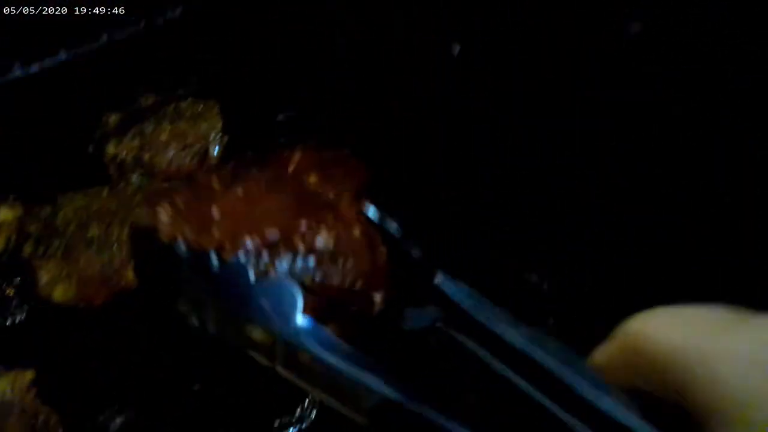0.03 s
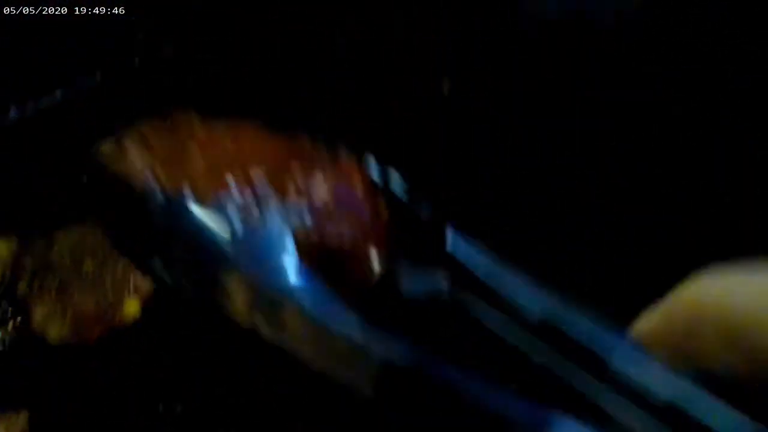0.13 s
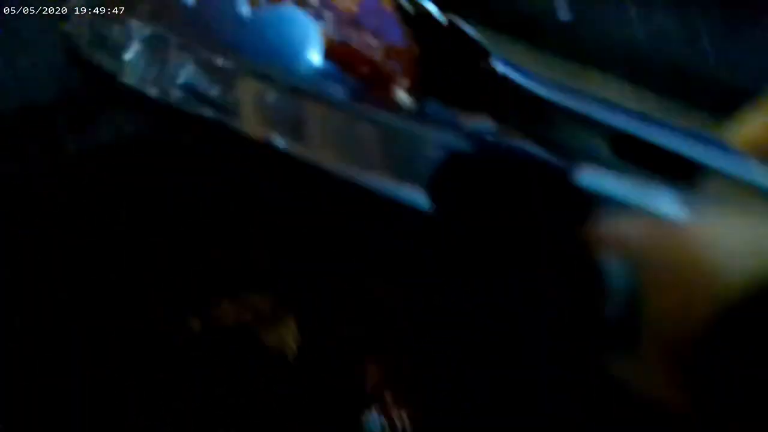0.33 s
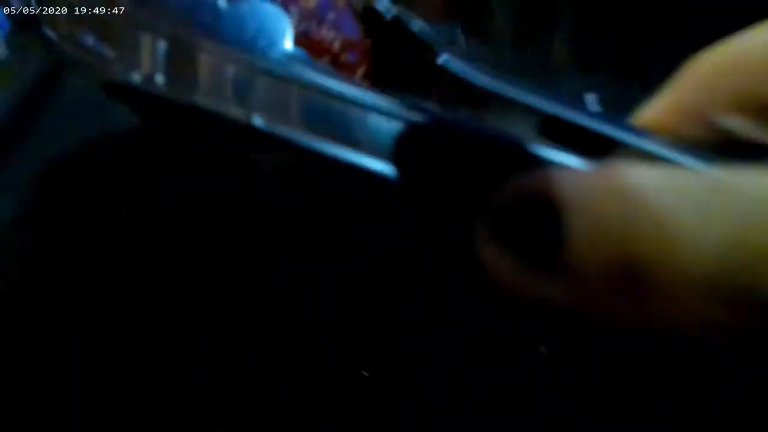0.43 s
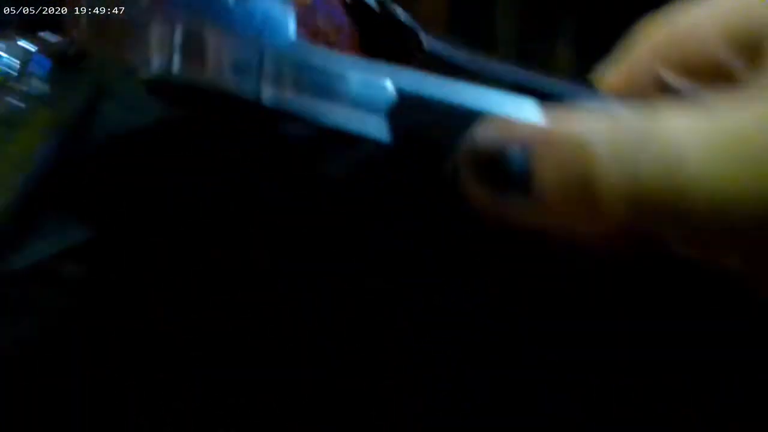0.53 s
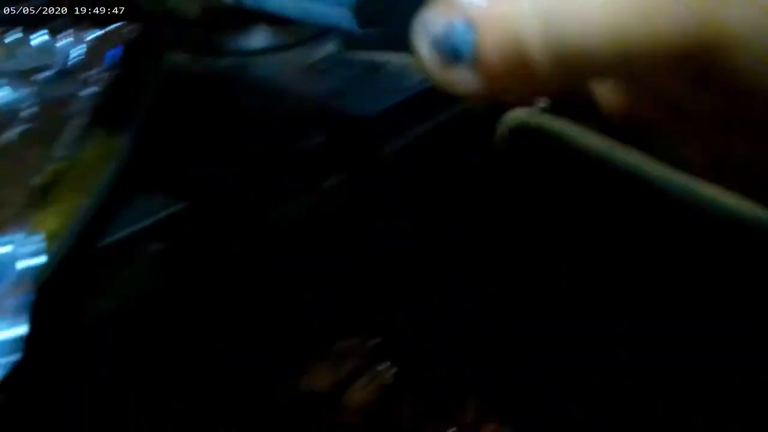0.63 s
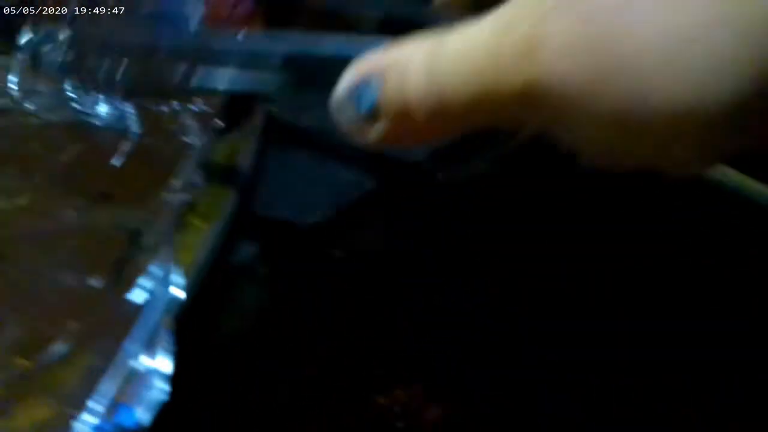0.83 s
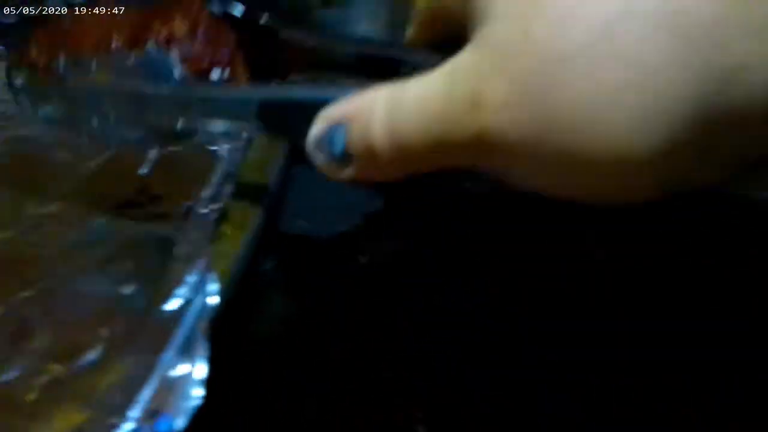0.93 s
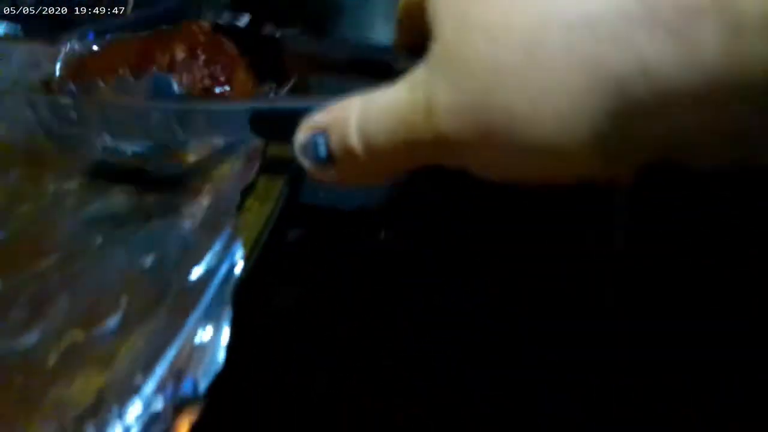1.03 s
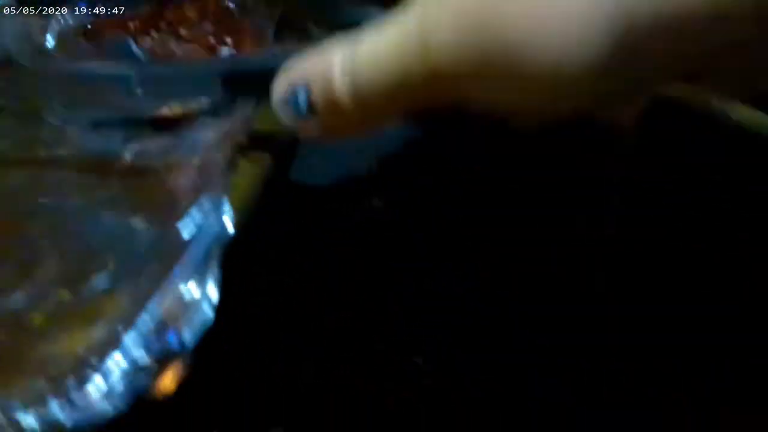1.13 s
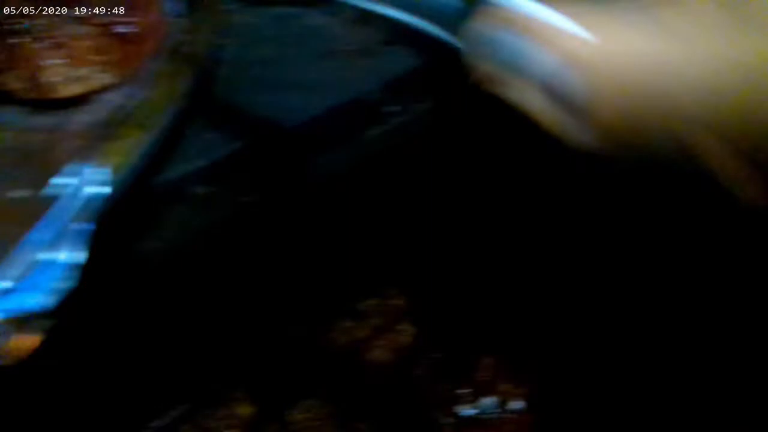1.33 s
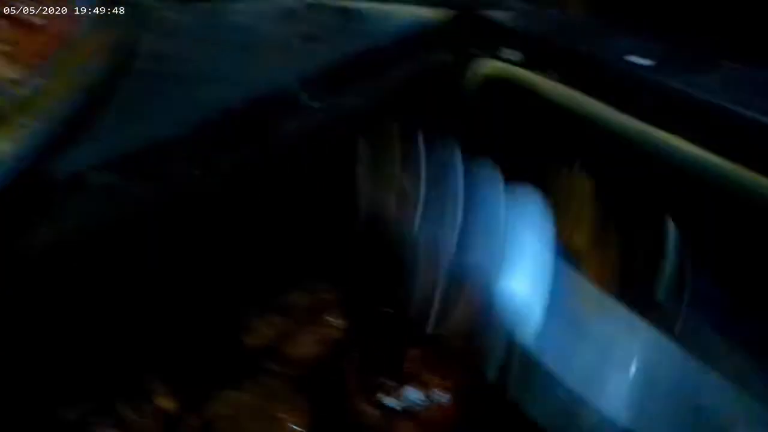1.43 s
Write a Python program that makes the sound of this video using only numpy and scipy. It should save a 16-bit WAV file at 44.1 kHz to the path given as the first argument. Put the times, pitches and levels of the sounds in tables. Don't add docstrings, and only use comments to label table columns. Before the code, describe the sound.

Bright foil crackle bursts under metal tongs late in the moment, after a low thud makes the tray knock and grate wires jingle, then a near-silent gap. Close, dry outdoor pickup over faint hiss and insects.

```python
import sys
import numpy as np
from scipy import signal
from scipy.fft import rfft, irfft, next_fast_len
from scipy.io import wavfile
from scipy.ndimage import map_coordinates

SR = 44100
rng = np.random.default_rng(int(sys.argv[2]) if len(sys.argv) > 2 else 0)


def how_loud(loudness_db):
    steps = np.asarray(loudness_db, float) / 20
    return 10 ** steps


def file_out(sig):
    cols = np.atleast_2d(sig).T
    lim = np.clip(cols, -1, 1)
    pcm = np.round(lim * 32767).astype(np.int16)
    wavfile.write(sys.argv[1], SR, pcm)


N = 66150
TOP_HZ = 15990

# pitch_hz, level_db (per Hz)
HISS_TONE = [(71, -13), (120, -3.5), (188, -3.5), (755, -9), (2230, -16), (4370, -15.5), (5150, -15),
             (15800, -28)]
# pitch_hz, level_db (per Hz)
RUMBLE_TONE = [(10, -32.5), (30, -10), (70, -11), (130, -32.5), (200, -63)]

# pitch_hz, level_db, t60_s, start_s, rise_s
SHELF_MODES = [
    (23.78, -14.2, 1.71, .2318, .0046),
    (42.2, -20.2, .26, .2418, .0012),
    (64.72, 25, .172, .2176, .0349),
    (65.19, 15, .217, .2256, .0154),
    (91.4, -6.6, .198, .2234, .0037),
]
# start_s, level_db, rise_s, hold_s, t60_s
CREAKS = [
    (0.197, -36, 0.021, 0.057, 1),
    (0.632, -54, 0.034, 0.038, 0.21),
    (1.066, -41.5, 0.02, 0.07, 0.96),
]
# pitch_hz, level_db (per Hz)
CREAK_TONE = [(30, -26), (60, 5.5), (110, -2), (170, -10.5), (260, -43)]

# start_s, level_db (peak), pitch_hz, t60_s
PAN_RINGS = [
    (.3, -34, 187, 0.16),
    (.222, -23, 235, 0.1396),
    (.262, -29.5, 259, 0.089),
    (.315, -32, 257, 0.21),
    (.39, -41, 252, 0.28),
    (0.458, -38.5, 244.4, 0.12),
    (.51, -37, 253.3, 0.12),
    (1.099, -14.5, 228.4, 0.089),
    (1.2012, -20, 250, 0.089),
    (1.311, -40, 230, 0.12),
]
# start_s, level_db (peak), favoured pitch_hz, crack_db (over the knock)
KNOCKS = [(0.2221, -18, 730, -19.5), (.2248, -31, 2454, -3), (0.2412, -22, 780, -9.5),
          (0.251, -46, 1410, -21.5), (.28, -41, 805, -21.5), (.291, -49, 810, -17),
          (0.3138, -26.5, 646, -24.5), (0.323, -34, 2040, -25.5), (.335, -52, 800, -22),
          (0.359, -36, 690, -17), (0.389, -39, 775, -17), (0.409, -31.5, 627, -16.5),
          (0.434, -47.5, 1630, -36), (0.602, -41.5, 680, -22), (1.067, -26.5, 980, -4.5),
          (1.098, -19, 823, -2), (1.105, -25, 1660, -25), (1.126, -43, 1200, -12), (1.2, -27, 1130, -22.5)]
# pitch_hz, t60_s
TRAY_MODES = [(463, 0.031), (640, 0.026), (790, 0.0423), (980, 0.045), (1230, 0.049), (1450, 0.08),
              (1600, 0.049), (1800, 0.051), (2160, 0.043), (2660, 0.028)]
# start_s, level_db (peak), pitch_hz, t60_s
PINGS = [(0.2247, -18.5, 1580, 0.021), (0.245, -27, 1456, 0.054), (.281, -39, 1440, 0.13),
         (.288, -31.5, 790, 0.061), (.3, -45, 1798, 0.17), (.322, -20.5, 1557, 0.024),
         (.336, -40.5, 1780, 0.098), (.39, -42, 1440, .05), (.41, -43, 1340, .04), (1.074, -29, 1187, 0.06),
         (1.0985, -15.5, 2180, 0.023), (1.105, -17.5, 1243, 0.036), (1.111, -15, 1250, 0.039),
         (1.127, -19.5, 1333, 0.022)]
# pitch_hz, level_db (per Hz)
CRACK_TONE = [(600, -30), (1500, 5), (4300, 3.5), (6000, -7), (8500, -1.5), (11500, -11.5), (15000, -21)]
# start_s, level_db, rise_s, hold_s, t60_s
RATTLES = [
    (.222, -32, 0.0051, 0.0074, 0.26),
    (.31, -41.5, 0.0018, 0.024, 0.37),
    (1.045, -37, 0.041, 0.03, 0.11),
    (1.092, -35.5, 0.0052, 0.026, 0.36),
    (1.15, -41.5, 0.04, 0.0275, 0.238),
    (1.2, -38.5, 0.0045, 0.013, 0.077),
    (1.3, -57, 0.0058, 0.0463, 0.33),
]
# pitch_hz, level_db (per Hz)
RATTLE_TONE = [(180, -30), (300, 8), (652, 4), (1440, -4.5), (2300, -12), (5000, -15), (6500, -57),
               (11000, -120)]
# start_s, level_db, rise_s, hold_s, t60_s
JINGLE = (.244, -42.5, .003, .012, .62)
# pitch_hz, width_hz, level_db
WIRES = [(3300, 1500, -17), (4950, 300, -6), (5660, 500, -6), (6600, 800, -1), (8250, 900, 0),
         (10000, 1200, -13), (11300, 700, -14)]
# start_s, level_db (peak), pitch_hz
TICKS = [(0.226, -39, 7700), (0.2258, -38.5, 6680), (0.2278, -37.5, 5210), (0.2416, -21.5, 4530),
         (0.2418, -28, 7650), (0.2427, -24.5, 3390), (0.2428, -29.5, 9850), (0.2518, -34.5, 6760),
         (0.2535, -33.5, 8150), (0.2805, -48, 6800)]

# start_s, level_db (rms), rise_s, hold_s, t60_s
PUSHES = [(.52, -60, 0.009, .02, 0.12), (.6, -56, 0.00165, 0.0077, 0.089),
          (1.0385, -33, 0.0035, 0.033, 0.53), (1.066, -28.5, 0.0054, 0.041, 0.16),
          (1.088, -13.5, 0.01, 0.0276, 0.23), (1.1565, -23, 0.0016, 0.0015, 0.14),
          (1.165, -28, 0.018, 0.037, 0.096), (1.183, -22.5, 0.0096, 0.0082, 0.24),
          (1.197, -29, 0.0091, 0.014, 0.072), (1.269, -41.5, 0.0157, 0.012, 0.234),
          (1.296, -35.5, 0.0013, 0.01, 0.38), (1.322, -30.5, 0.0045, 0.009, 0.14),
          (1.350, -38, 0.0015, .003, 0.107), (1.368, -32.5, 0.0073, 0.0095, 0.092),
          (1.385, -33.5, 0.0016, 0.00213, 0.15), (1.468, -41, 0.0011, 0.00056, 0.068),
          (1.47, -47, 0.0019, 0.0076, 0.237)]
# pitch_hz, level_db (per Hz)
FOIL_TONE = [(700, -6), (900, -8), (2400, -10.5), (3300, -5), (4500, -7), (7400, -4.5), (9500, -8.5),
             (15300, -22), (15900, -29)]
# start_s, level_db (peak), pitch_hz
SNAPS = [(1.0453, -23, 7020), (1.0683, -14.5, 6020), (1.068, -31, 7600), (1.0683, -23.5, 9680),
         (1.069, -23, 2980), (1.079, -23.8, 5700), (1.0933, -6, 5840), (1.0952, -15.5, 2780),
         (1.0969, -4, 6954), (1.0976, -2.5, 8970), (1.099, -10, 7300), (1.1027, -6.6, 6930),
         (1.1056, -4, 8400), (1.106, -4, 7180), (1.1096, -3, 7600), (1.1118, -7, 5700), (1.1165, -5, 7500),
         (1.1178, -7, 5960), (1.1247, -7, 9000), (1.1218, -8.5, 6500), (1.1258, -1, 5990),
         (1.128, -7.5, 7750), (1.1293, -5, 6300), (1.133, -12, 7300), (1.1593, -8, 7750),
         (1.1584, -9, 6000), (1.1595, -8.5, 4350), (1.1623, -12, 3247), (1.1633, -17, 6100),
         (1.1931, -5.5, 5730), (1.1936, -22, 7900), (1.1998, -10.5, 5330), (1.2056, -13, 7270),
         (1.2067, -16.5, 5000), (1.208, -14, 8700), (1.2063, -16, 5640), (1.2098, -17, 7300),
         (1.2105, -12.5, 6230), (1.2967, -21, 7690), (1.3234, -23, 3197), (1.3288, -27, 8130),
         (1.3285, -19.5, 6000), (1.3311, -29.5, 7410), (1.3336, -21, 5440), (1.3353, -23, 6460),
         (1.3764, -26.3, 5300), (1.3856, -22.5, 3800), (1.3867, -20, 7870), (1.3879, -21.5, 4900),
         (1.3879, -19, 6360), (1.389, -28, 4100), (1.3917, -24, 3360), (1.4685, -49, 8580),
         (1.468, -29.3, 3300), (1.4687, -32, 6240), (1.4715, -32, 3700)]
# start_s,
# level_db (peak), pitch_hz
MORE_SNAPS = [(0.4043, -37.5, 5450), (.4045, -35, 6400), (1.1377, -20, 3300), (1.1447, -20, 6800),
              (1.291, -34, 7520), (1.3051, -26, 6100), (1.3508, -32, 8300), (1.369, -34, 6300)]
# start_s, level_db (peak)
CLICKS = [
    (1.0681, -22),
    (1.0975, -6),
    (1.1575, -15),
    (1.1935, -19),
    (1.2965, -29.5),
    (1.3295, -27),
    (1.3516, -27),
    (1.3885, -29.5),
    (1.4681, -35),
]

# start_s, length_s, low_hz (all kept under), high_hz (none kept over), share of bands kept
THINNED = [
    (.313, .021, 2000, 8500, .65),
    (.403, .011, 1500, 7000, .65),
    (.949, .012, 2000, 8000, .6),
    (1.014, .012, 1000, 5500, .5),
    (1.447, .011, 1000, 9000, .88),
]


def unit(x):
    return x / np.sqrt(np.mean(x ** 2) + 1e-20)


def along(points, hz):
    f, v = np.transpose(points)
    return np.interp(np.log(hz + 1), np.log(f + 1), v)


def since(s):
    return np.clip(np.arange(N) / SR - s, 0, None)


def wobble(rate):
    return map_coordinates(rng.standard_normal(size=200), [np.arange(N) * rate / SR])


def filtered(x, response):
    m = next_fast_len(N + 8192)
    return irfft(rfft(x, m) * response(np.fft.rfftfreq(m, 1 / SR)), m)[..., :N]


def coloured_noise(response):
    return unit(filtered(rng.standard_normal(N), response))


def ring(s, db, hz, t60, rise):
    out, first = np.zeros(N), int(s * SR) + 1
    last = min(N, first + int((2 * t60 + 10 * rise) * SR))
    t = np.arange(first, last) / SR - s
    envelope = how_loud(db - 60 * t / t60) * (1 - np.exp(-t / rise)) ** 2
    out[first:first + len(t)] = envelope * np.sin(2 * np.pi * hz * t)
    return out


def snap(s, db, hz):
    return ring(s, db + 4, hz, t60=0.007, rise=0.0003)


def swell(s, db, rise, hold, t60, now=None):
    t = since(s) if now is None else np.clip(now - s, 0, None)
    release = np.clip(t - rise - hold, 0, None)
    return np.clip(t / rise, 0, 1) ** 2 * how_loud(db - 60 * release / t60)


def grains(rows, spectrum, cycles, spiky_db, narrow, count, size):
    at, pitch, luck = rng.random((count, 3)).T
    lo, hi = spectrum[1][0], min(spectrum[-2][0], TOP_HZ)
    hz, start = lo * (hi / lo) ** pitch, (at * N).astype(int)
    sooner = np.maximum(hz / 7000, 1)
    centre_hz = 6000
    away = narrow * abs(np.log2(hz / centre_hz)) * np.where(hz > centre_hz, 7.5, 1)
    most_db = max(row[1] for row in rows)
    power = sum(swell(s, db + away * (db - most_db), rise, hold, t60 / sooner, now=start / SR) ** 2
                for s, db, rise, hold, t60 in rows)
    turns = hz[:, None] * np.arange(size) / SR
    shape = np.sin(2 * np.pi * turns) * turns * np.exp(-5 * turns / cycles)
    shape *= np.hanning(2 * size)[size:]
    spikes_db = -spiky_db * np.log(1 - luck)
    shape *= (hz * how_loud(along(spectrum, hz) + spikes_db))[:, None]
    shape *= np.sqrt(power)[:, None] * np.sqrt(N / np.sum(shape ** 2))
    where = start[:, None] + np.arange(size)
    return np.bincount(where.ravel(), shape.ravel(), N + size)[:N]


def night():
    hiss = coloured_noise(lambda hz: how_loud(along(HISS_TONE, hz)))
    rumble = coloured_noise(lambda hz: how_loud(along(RUMBLE_TONE, hz)))
    insects = coloured_noise(lambda hz: np.exp(-((hz - 4380) / 380) ** 2))
    pulse_db = 1.6 * (wobble(8) + wobble(69.64))
    return how_loud(-56) * hiss + how_loud(-52.5) * rumble + how_loud(-63 + pulse_db) * insects


def shelf():
    thud = sum(ring(s, db, hz, t60, rise) for hz, db, t60, s, rise in SHELF_MODES)
    stir = coloured_noise(lambda hz: how_loud(along(CREAK_TONE, hz)))
    return thud + sum(swell(*row) for row in CREAKS) * stir


def knocks():
    octave_loss_db = 23
    out, cracks = np.zeros(N), np.zeros(N)
    for s, db, best_hz, crack_db in KNOCKS:
        for hz, t60 in TRAY_MODES:
            level_db = db + 2 * rng.standard_normal() - octave_loss_db * abs(np.log2(hz / best_hz))
            detuned_hz = hz * (1 + 0.023 * rng.standard_normal())
            out += ring(s, level_db, detuned_hz, t60, rise=0.00071)
        cracks += swell(s, db + crack_db, rise=0.0015, hold=0.0015, t60=0.031)
    return out + cracks * coloured_noise(lambda hz: how_loud(along(CRACK_TONE, hz)))


def wires():
    def bands(f):
        return sum(how_loud(db) * w * w / (w * w + (2 * (f - hz)) ** 2) for hz, w, db in WIRES)

    damping_db = -60 * since(0.412) / 0.06
    jingle = swell(*JINGLE) * how_loud(3.5 * wobble(120) + damping_db) * coloured_noise(bands)
    return jingle + sum(snap(*row) for row in TICKS)


def tray():
    pan = sum(ring(*row, rise=0.0015) for row in PAN_RINGS)
    pings = sum(ring(*row, rise=0.0011) for row in PINGS)
    rattle = grains(RATTLES, RATTLE_TONE, cycles=7, spiky_db=2, narrow=0, count=5000, size=500)
    return pan + pings + knocks() + rattle


def foil():
    crackle = grains(PUSHES, FOIL_TONE, cycles=9.1, spiky_db=-0.5, narrow=0.0457, count=24000, size=200)
    clumps = how_loud(1.2 * wobble(130))
    pops = sum(snap(*row) for row in SNAPS + MORE_SNAPS)
    clicks = sum(swell(s, db, rise=0.000074, hold=0, t60=0.0084) for s, db in CLICKS)
    bright = coloured_noise(lambda hz: how_loud(along(FOIL_TONE, hz)) * hz / np.hypot(hz, 3000))
    return clumps * crackle + pops + clicks * bright


def scene():
    return (night() + shelf() + tray() + wires() + foil())[None]


def thinned(x):
    band_hz, emptied = 500, 0.9
    hz, now = np.fft.rfftfreq(N, 1 / SR), np.arange(N) / SR
    for s, length, lo, hi, share in THINNED:
        closing = np.clip(s + length + 0.003 - now, 0, 1) * 2
        gate = np.clip(np.minimum(since(s - 0.008), closing) / 0.01, 0, 1)
        power = abs(rfft(x[0] * gate)) ** 2
        bands = [np.flatnonzero(hz // band_hz == k) for k in range(lo // band_hz, hi // band_hz)]
        size = np.array([2 * np.sqrt(power[b].sum() / N / np.sum(gate ** 2)) for b in bands])
        peak = np.array([hz[b[power[b].argmax()]] for b in bands])
        rank = size * np.sqrt(peak) * how_loud(rng.standard_normal(len(bands)))
        kept = rank >= np.quantile(rank, 1 - share)
        lines = size[kept] @ np.sin(2 * np.pi * peak[kept, None] * now)
        x = x + gate * (lines - emptied * filtered(x, lambda f: f > lo))
    return x


def roll_off(x):
    return signal.sosfilt(signal.butter(12, 15990, fs=SR, output="sos"), x)


def record(dry):
    ceiling, knee = 0.95, 5
    held = dry / (1 + abs(dry / ceiling) ** knee) ** (1 / knee)
    limited = filtered(held, lambda hz: hz < TOP_HZ)
    mix = thinned(limited) + how_loud(-38.8)
    return roll_off(mix)


dry = scene()
out = record(dry)
file_out(out)
```